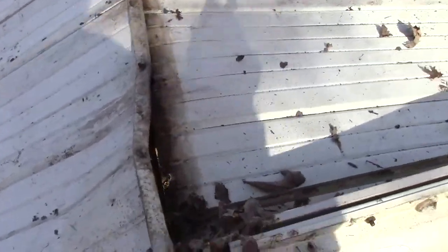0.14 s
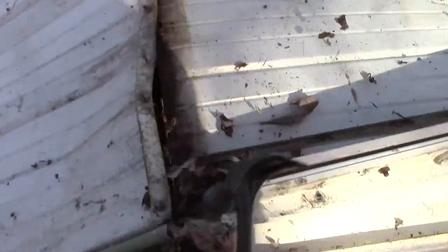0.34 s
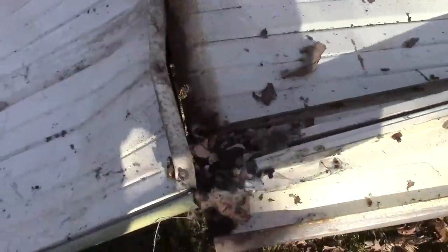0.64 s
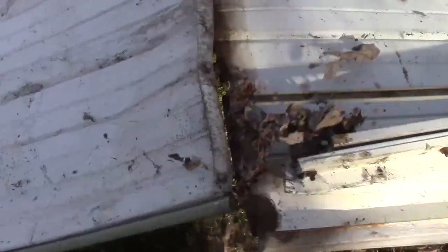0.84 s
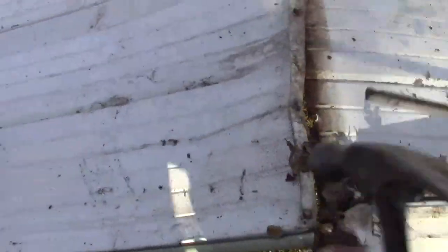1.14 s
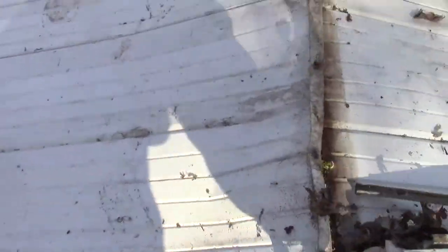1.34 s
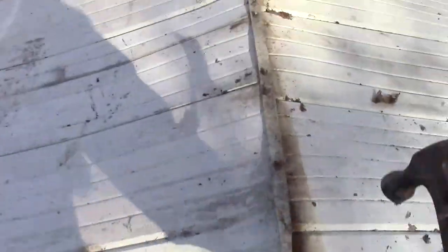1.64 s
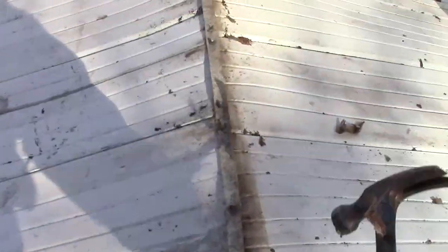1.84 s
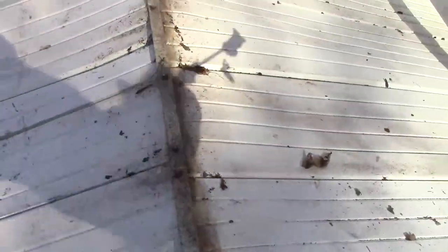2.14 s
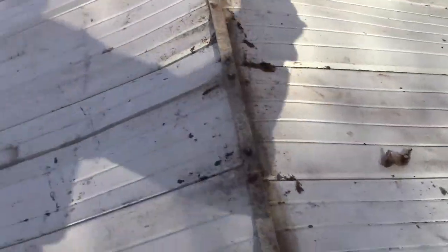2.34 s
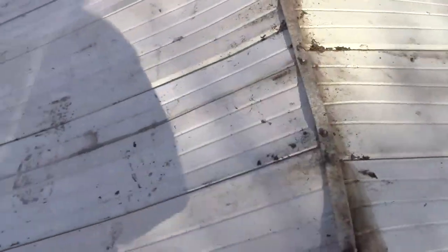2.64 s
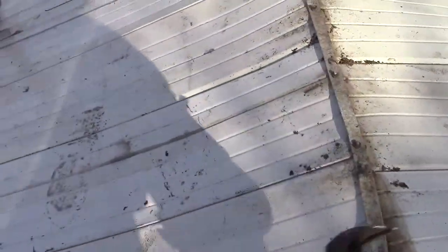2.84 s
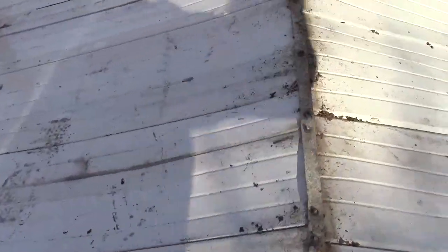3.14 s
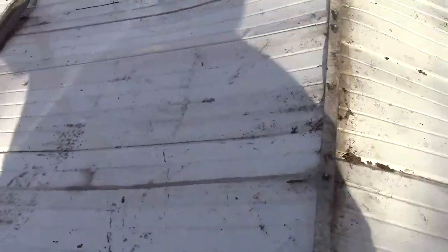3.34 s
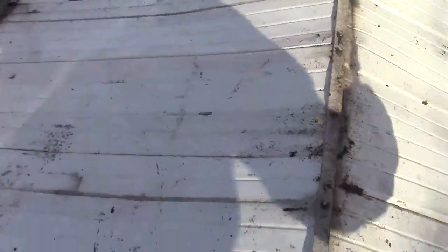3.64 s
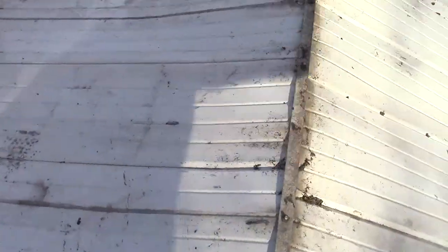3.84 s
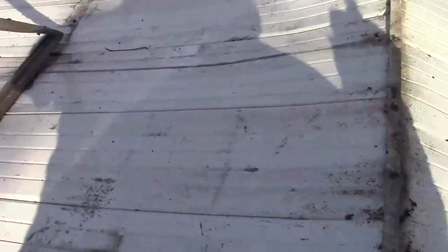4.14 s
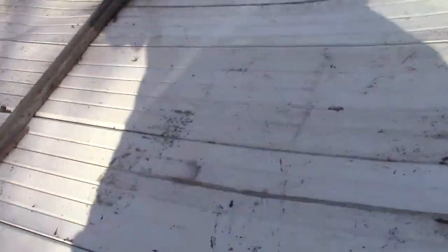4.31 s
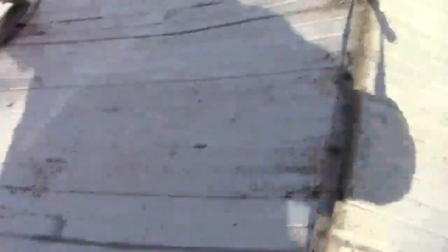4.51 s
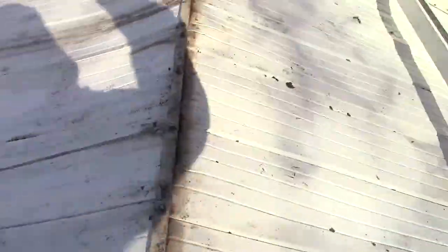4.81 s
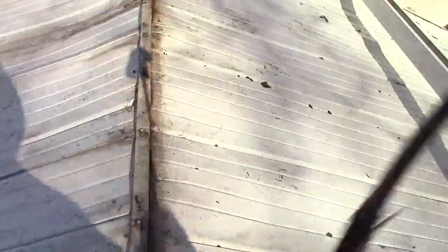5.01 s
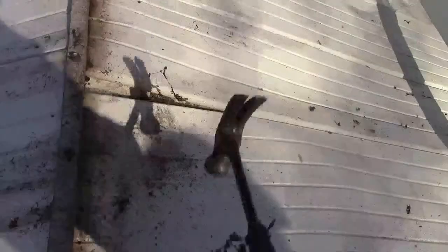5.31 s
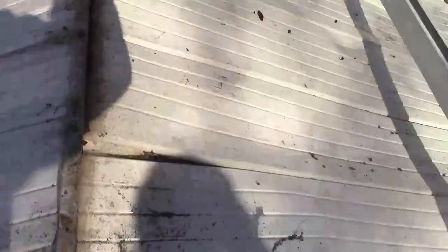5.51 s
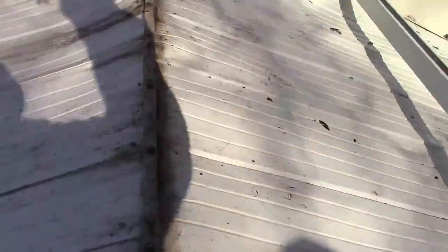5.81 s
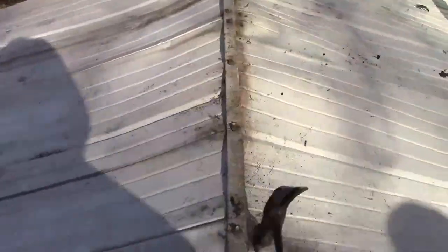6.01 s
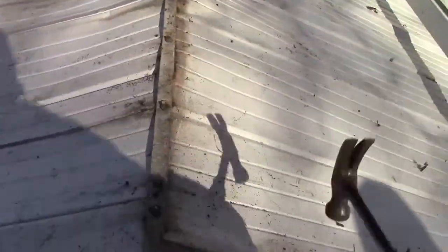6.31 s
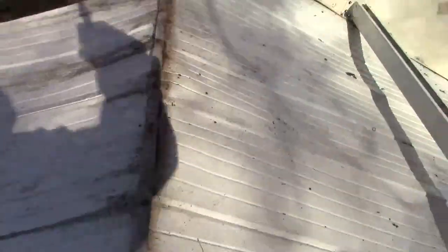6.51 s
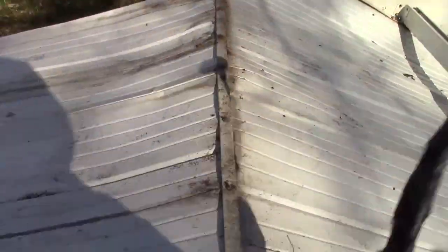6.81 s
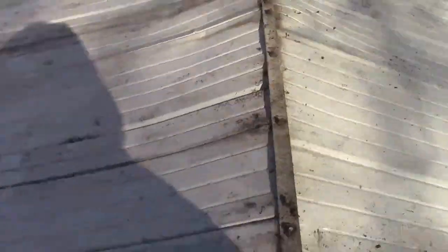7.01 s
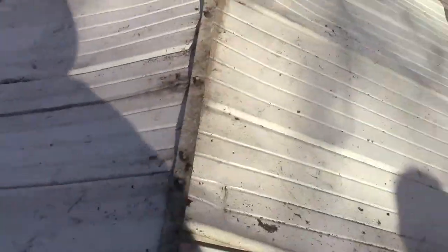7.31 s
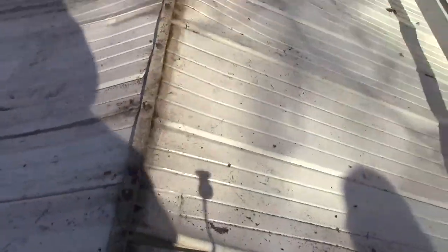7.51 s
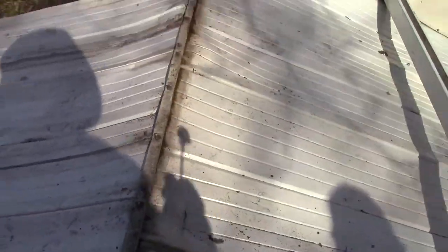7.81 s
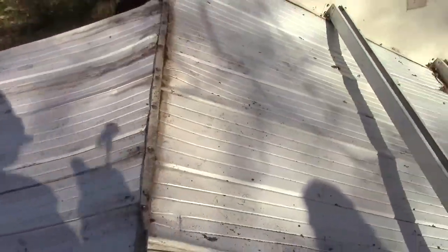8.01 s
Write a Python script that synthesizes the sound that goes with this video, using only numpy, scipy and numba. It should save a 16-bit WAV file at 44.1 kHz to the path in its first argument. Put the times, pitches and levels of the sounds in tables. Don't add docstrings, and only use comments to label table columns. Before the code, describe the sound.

A hammer beats thin ribbed steel panels outdoors, about a metre from a small camera. A loud, bright clang at 0.3 s is followed by a lighter slap at 0.5, another hard crash at 0.9 and a weak slap at 1.3. Feet or hands stir gritty debris around 1.4, then small ticks and a faint skipping ting near 2.0. Heavier, boomier blows crash at 2.5, 3.4, 4.3 and 5.1 s, most with a duller hollow panel slap 0.2 to 0.5 s later. A low creak groans around 3.9 to 4.1. Further single bangs hit at 6.0 and 6.9 s, with faint grazing rings between. Each shimmers and buzzes for roughly half a second while dirt patters down. After 7.2 s, debris rustles, a sharp knock sounds at 7.6, and rusty creaks squeak until the end over faint yard air.

```python
import sys
import numpy as np
from numba import njit
from scipy import signal
from scipy.fft import rfft, irfft
from scipy.io import wavfile
from scipy.ndimage import uniform_filter1d, minimum_filter1d

SR = 44100
rng = np.random.default_rng(int(sys.argv[2]) if len(sys.argv) > 2 else 0)


def invert_db(x):
    u = np.asarray(x, float) / 20
    return 10 ** u


def master(y):
    cut = np.clip(np.atleast_2d(y).T, -1, 1)
    pcm = np.round(cut * 32767)
    wavfile.write(sys.argv[1], SR, pcm.astype(np.int16))


N = 359415

# (time [s], peak level [dB], boom level [dB], low mode [Hz], middle mode [Hz])
BLOWS = [(0.2777, 2, -11, 792, 1834), (0.54, -18, -6, 807, 1560), (0.8699, 0, -17, 766, 1460),
         (1.3097, -23.5, -6, 362, 1727), (2.3561, -34, -3, 375, 689), (2.5271, 1, -9.5, 433, 1852),
         (3.0721, -19.5, -1, 385, 1810), (3.4137, -2.5, -3, 640, 1830), (3.8149, -16, 0, 409, 1780),
         (4.2819, 0, -4.5, 670, 2256), (4.565, -17.5, 1, 387, 2165), (5.1223, 2, -6, 521, 2076),
         (5.3429, -19, -0.5, 574, 1760), (6.0409, -0.5, -5, 522, 2424), (6.9215, 1, -6, 503, 2327)]
# (frequency [Hz], level per Hz [dB])
SHEET_SPECTRUM = [(24, -46), (40, -44.5), (211, -1.5), (367, 1), (485, 0), (1110, -5), (1580, -2),
                  (1800, 0), (2490, -4), (2970, -3), (3830, -3), (7180, 3), (14200, -14), (15300, -30),
                  (16500, -46)]
# (frequency [Hz], t60 [s])
SHEET_T60 = [(100, 0.45), (260, 0.53), (700, 0.62), (1840, 0.52), (4850, 0.34), (12800, 0.27)]
# (frequency [Hz], side minus mid level [dB])
PORTS = [(60, -31), (110, -31), (200, -42.5), (380, -48), (700, -32), (1290, -20), (2380, -18.5),
         (4400, -11.5), (8120, -10.5), (15000, -15)]
# (frequency [Hz], left minus right level [dB])
CAPSULE_LEAN = [(2200, 0), (4000, -1.2), (15000, -.9)]
# (frequency [Hz], level relative to the blow [dB], t60 [s])
HEAD_MODES = [
    (4720, -53, .9),
    (6950, -50, .6),
]
# (time [s], peak level [dB], change per skip [dB])
GRAZES = [
    (2.049, -52, -2.5),
    (6.577, -65, -13),
    (6.7126, -58, -4),
]
# (time [s], peak level [dB], frequency [Hz], t60 [s])
TIPS = [
    (2.159, -54, 7660, 0.17),
    (6.7565, -56, 7500, 0.13),
]
# (time [s], peak level [dB], frequency [Hz], t60 [s])
CREAKS = [(2.9756, -47, 1650, 0.14), (6.6508, -51, 1840, 0.11), (7.7159, -43.5, 1750, 0.14),
          (7.7494, -55, 1730, 0.14), (7.8585, -41, 1700, 0.14), (7.87, -54, 1700, 0.17),
          (7.9843, -51, 1770, 0.098), (7.86, -45, 2130, 0.12), (7.8794, -54, 2125, 0.12),
          (3.919, -37, 544, 0.1), (3.999, -45.5, 521, 0.2), (4.096, -46, 841, 0.3),
          (6.696, -51.5, 682, 0.57), (6.739, -56, 672, 0.43)]
# (time [s], peak level [dB], centre frequency [Hz], low thud level [dB], width [octaves])
TAPS = [(0.8077, -43, 2040, -17, 1.1), (1.2747, -28, 3000, -17, 1.9), (1.3994, -28, 1340, -11, 0.99),
        (1.6643, -39.5, 1980, -14, 0.86), (2.0325, -37, 1730, -5, 0.48), (2.4704, -63.5, 1910, -0.3, .95),
        (4.9598, -51.5, 1940, 3.5, 0.99), (6.4914, -48, 1733, -13, 0.66), (6.7048, -47.5, 1530, -0.5, 0.66),
        (6.8664, -29.5, 3920, -27, 1.2), (7.311, -49, 1920, 13, .8), (7.5262, -43.5, 1820, -21, 1.1),
        (7.6457, -26.5, 1500, -28, 0.98), (7.7866, -45, 1930, -13, .4), (7.8072, -42, 2600, -3, .9),
        (7.9402, -60, 1517, 7, .8)]
# (time [s], peak level [dB], centre frequency [Hz])
BITS = [(0.3994, -23, 3400), (0.9453, -30, 3350), (1.449, -45, 3400), (1.6984, -47.5, 3490),
        (1.7794, -50, 3640), (1.8826, -45.5, 3340), (1.942, -42.5, 6100), (2.718, -40, 8070),
        (2.849, -65, 3500), (3.199, -41, 3960), (3.6524, -40, 5150), (3.679, -35, 3200),
        (4.0512, -44.5, 3300), (4.0833, -40, 6360), (4.4726, -38, 4280), (4.6194, -27.5, 6010),
        (4.7588, -44, 6370), (5.4994, -42.5, 6780), (5.5494, -50, 5570), (5.6835, -45, 7090),
        (7.646, -43, 4200), (6.349, -43.5, 5690), (6.3685, -45, 6760), (6.4413, -40, 9000),
        (7.1935, -32.5, 5910), (7.2208, -46, 6660), (7.2634, -39, 4770), (7.3467, -42, 4350)]
# (time [s], peak level [dB])
CRUMBS = [(0.811, -50), (1.6847, -43.5), (1.967, -47), (2.1194, -50), (4.213, -58.5), (4.964, -52.5),
          (5.0598, -57.5), (5.0903, -57), (5.744, -52), (5.819, -57), (5.9254, -60.5), (6.719, -51),
          (7.7194, -55), (7.9694, -53)]
# (time [s], level [dB])
STIR = [(0.0, -68), (.26, -79), (1.15, -72.5), (1.4, -50.5), (1.6, -63.5), (1.7, -63.5), (2.02, -58),
        (2.2, -63.5), (2.45, -75), (3.7, -63.5), (4.2, -72), (5.1, -68), (5.6, -66.5), (6.01, -73.5),
        (6.75, -66.5), (7.3, -52.5), (7.6, -71), (8.15, -76)]
# (frequency [Hz], level per Hz [dB])
HISS_SPECTRUM = [(710, -39), (1200, -5.5), (2040, 3.5), (2450, -0.5), (3430, -2), (6650, -3), (14500, -14),
                 (16000, -27.5)]
# (frequency [Hz], level per Hz [dB])
MURMUR_SPECTRUM = [(24, -87), (40, -47), (91, -18.5), (220, 0), (482, -8), (539, -4), (769, -6.5),
                   (1230, -16), (1370, -17.5), (3500, -32), (4550, -63.5), (7700, -120)]
# (frequency [Hz], level per Hz [dB])
YARD_SPECTRUM = [(24, -67.5), (40, -34), (204, -2), (269, -4), (305, -1), (1300, -3.5), (1720, 2),
                 (4030, -12.5), (14100, -24), (16000, -40.5)]


def panels():
    s, db, boom_db = np.transpose(BLOWS)[:3]
    bright_db = -8.5 + 0.33 * db
    settled = np.clip(np.diff(s, prepend=0) / 0.33, 0, 1.25)
    length = 0.59 - .013 * db * settled
    thump_db = -18 + 1.6 * db + 0.93 * boom_db - 10.5 * (s < 1.5)
    hz, share_db = thicket(count=1400)
    low = np.clip(np.log2(1300 / hz), 0, 1)
    high = np.clip(np.log2(hz / 3200), 0, 1)
    deep = np.clip(np.log2(260 / hz), 0, 1)
    tint_db = np.outer(boom_db + 6.5, low - deep) + np.outer(bright_db - 0.5, high)
    tint_db = tint_db + np.outer(thump_db + 31, deep)
    spread = np.clip(rng.standard_normal(len(hz)), -2, 2)
    crack = np.arange(len(hz)) % 4 == 0
    mode_t60 = 1.141 * at(SHEET_T60, hz) * np.exp(0.23 * spread) * np.where(crack, .22, 1)
    radiate_db = -2.5 * spread + (7 + 4 * high) * crack + 3.34
    mode_db = db[:, None] + tint_db + at(SHEET_SPECTRUM, hz) + share_db + radiate_db
    return strike(s, mode_db, hz, np.outer(length, mode_t60), chatter_s=.012, chatter_db=-36, wobble=1.3)


def overlap_buzz():
    return invert_db(1.1 * flurry(step=330))


def thicket(count):
    place = (np.arange(count) + rng.random(count)) / count
    hz = 50 + 16400 * place ** 1.5
    return hz, 10 * np.log10(place ** .5 / count + 1e-9)


def strike(starts, db, hz, t60, chatter_s, chatter_db, wobble):
    first = (starts * SR).astype(int)
    which = np.clip(np.searchsorted(first, np.arange(N), side="right") - 1, 0, None)
    age = (np.arange(N) - first[which]) / SR
    push = invert_db(chatter_db) * np.exp(-np.abs(age) / chatter_s) * rng.laplace(size=N) * (age > 0)
    push[first] = 1
    pole = np.exp(2j * np.pi * hz / SR - np.log(1000) / (np.clip(t60, .01, 3) * SR))
    flex_hz = wobble * 9 * hz ** .25
    bend = np.exp(2j * np.pi * flex_hz / SR * rng.standard_normal((211, len(hz))))
    side = invert_db(at(PORTS, hz)) * rng.standard_normal(len(hz)) + (invert_db(at(CAPSULE_LEAN, hz) / 2) - 1)
    grip = rng.choice([-1, 1], db.shape) * invert_db(db + 2.0 * rng.standard_normal(db.shape))
    return resonate(push + 1e-18, which, grip, pole, bend, side)


@njit(fastmath=True)
def resonate(push, which, gain, pole, bend, side):
    out, a, b = np.zeros((2, len(push))), np.zeros(len(side)), np.zeros(len(side))
    c, s = np.zeros(len(side)), np.zeros(len(side))
    for i in range(len(push)):
        if i % 128 == 0:
            p = pole[which[i]] * bend[i // 128 % len(bend)]
            c, s = p.real.copy(), p.imag.copy()
        g, m, d = gain[which[i]], 0., 0.
        for k in range(len(side)):
            a[k], b[k] = a[k] * c[k] - b[k] * s[k] + push[i] * g[k], a[k] * s[k] + b[k] * c[k]
            m += b[k]
            d += b[k] * side[k]
        out[0, i], out[1, i] = m + d, m - d
    return out


def single_modes():
    s, db, boom_db, low_hz, middle_hz = np.transpose(BLOWS)

    def rows(level_db, hz, t60):
        return np.transpose([s, level_db, hz + 0 * s, t60 + 0 * s])

    low = rows(0.5 + .75 * db + boom_db, low_hz, 0.11)
    middle = rows(-4 + 0.44 * db, middle_hz, .065)
    hollow = rows(0.5 + 0.87 * db + boom_db, 517, 0.054)
    slaps = hollow[db < -10]
    low_ring = rings(low, -8, rise_s=0.0011, split=0.035)
    middle_ring = rings(middle, -12.0, rise_s=0.00052, split=0.039)
    return low_ring + middle_ring + rings(slaps, -5.5, rise_s=0.00097, split=0.21)


def rings(table, offset_db, rise_s, split, rough=0):
    out, t = np.zeros(N + SR), np.arange(SR) / SR
    for (s, db, hz, t60), (beat, turn) in zip(table, rng.random((len(table), 2))):
        twin_hz = hz * (1 + split * (0.25 + beat))
        pair = np.sin(2 * np.pi * hz * t) + 0.13 * np.sin(2 * np.pi * (twin_hz * t + turn))
        envelope = invert_db(db + offset_db - 60 * t / t60) * (1 - np.exp(-t / rise_s))
        out[int(s * SR):int(s * SR) + SR] += envelope * pair
    return out[:N] * (1 + rough * flurry(step=110)) / np.hypot(1, rough)


def hammer_head():
    struck = [(s, db + below_db, hz, t60) for s, db, *_ in BLOWS for hz, below_db, t60 in HEAD_MODES]
    skips = [(s + k * 0.035, db + k * fade_db, 4550, 0.34) for s, db, fade_db in GRAZES for k in range(4)]
    ringing = rings(struck, 0, rise_s=.002, split=.004, rough=.8)
    return ringing + rings(skips + TIPS, -3, rise_s=.002, split=.006, rough=.6)


def creaks():
    return rings(CREAKS, -3.5, rise_s=.008, split=.04, rough=1.5)


def ticks():
    crumbs = [(*crumb, 6500) for crumb in CRUMBS]
    rows = [(*tap, 0.062) for tap in TAPS]
    # thud [dB], width [octaves], t60 [s]
    rows += [(*bit, -25.5, 1, .12) for bit in BITS + crumbs]
    s, db, centre, thud_db, octaves, t60 = np.array(sorted(rows)).T[:, :, None]
    hz, share_db = thicket(count=500)
    width = np.clip(octaves, .15, 3)
    patch = invert_db(-6 * (np.log2(hz / centre) / width) ** 2 - 9.3 * np.log10(width))
    thud = invert_db(thud_db + 11 - 7.9 * np.log2(hz / 400) ** 2)
    edge_db = -9 * (hz / 11000) ** 2 - 9 * np.clip(np.log2(220 / hz), 0, None)
    mode_db = db + 20 * np.log10(patch + thud + 1e-4) + edge_db + share_db + 4.0
    mode_t60 = t60 * (1500 / hz) ** 0.27
    return strike(s[:, 0], mode_db, hz, mode_t60, chatter_s=0.0056, chatter_db=-32, wobble=1.6)


def dirt_hiss():
    grains, shared = 0, flurry(step=700)
    for edges_hz in [(800, 2500), (2500, 4500), (4500, 8000), (8000, 17000)]:
        grain_db = 2.6 * np.minimum(rng.exponential(size=N), 7)
        patter = rng.standard_normal(N) * invert_db(grain_db + 1.5 * shared + 2.5 * flurry(step=1100))
        band = signal.butter(2, edges_hz, "band", fs=SR, output="sos")
        grains = grains + signal.sosfilt(band, patter)
    thrown = after_blows(BLOWS, full_db=-48.5, per_db=0.38, per_boom=0.47, peak_s=0.1972, abrupt=2.95)
    return colour(grains, HISS_SPECTRUM) * np.hypot(stirring(), thrown)


def sheet_murmur():
    sway = rng.standard_normal(N) * invert_db(3.5 * flurry(step=900))
    blows = [(-0.22, -11, -6)] + BLOWS
    swaying = after_blows(blows, full_db=-40, per_db=0.43, per_boom=0.67, peak_s=0.1525, abrupt=1.46)
    return colour(sway, MURMUR_SPECTRUM) * np.hypot(invert_db(-1.0) * stirring(), swaying)


def stirring():
    return invert_db(np.interp(np.arange(N) / SR, *np.transpose(STIR)))


def after_blows(blows, full_db, per_db, per_boom, peak_s, abrupt):
    t, power = np.arange(N) / SR, 0
    for s, db, boom_db, *_ in blows:
        age = np.clip(t - s, 0, None) / (peak_s * invert_db(0.08 * db))
        swell = age * np.exp((1 - age ** abrupt) / abrupt)
        power = power + (invert_db(full_db + per_db * db + per_boom * boom_db) * swell) ** 2
    return np.sqrt(power)


def flurry(step):
    return uniform_filter1d(np.repeat(rng.standard_normal(N // step + 1), step)[:N], step // 2)


def yard():
    return invert_db(-67.5) * colour(rng.standard_normal(N), YARD_SPECTRUM)


def colour(x, table):
    hz = np.maximum(np.arange(N // 2 + 1) * SR / N, 1)
    mid = irfft(rfft(x) * invert_db(at(table, hz)), N)
    side = irfft(rfft(mid) * invert_db(at(PORTS, hz)) * np.exp(1j * hz / 30), N)
    return np.array([mid + side, mid - side]) / mid.std()


def at(table, hz):
    points = np.array(table)
    return np.interp(np.log(hz), np.log(points[:, 0]), points[:, 1])


def scene():
    crash = panels() * overlap_buzz()
    steel = single_modes() + hammer_head() + creaks()
    debris = ticks() + dirt_hiss() + sheet_murmur()
    return crash + steel + debris + yard()


def band_limit(x):
    return signal.sosfilt(signal.butter(12, 17000, fs=SR, output="sos"), x)


def record(dry):
    cut = signal.sosfilt(signal.butter(3, 95., "high", fs=SR, output="sos"), dry)
    peak = -minimum_filter1d(-np.abs(cut).max(axis=0), size=129)
    held = signal.lfilter([.004], [1, -.996], peak)
    limited = cut * np.minimum(1, .35 / (held + 1e-9)) ** .3
    rounded = .72 * np.tanh(1.55 * limited)
    mix = signal.sosfilt(signal.butter(10, 15700., fs=SR, output="sos"), rounded)
    return band_limit(mix)


dry = scene()
out = record(dry)
master(out)
```